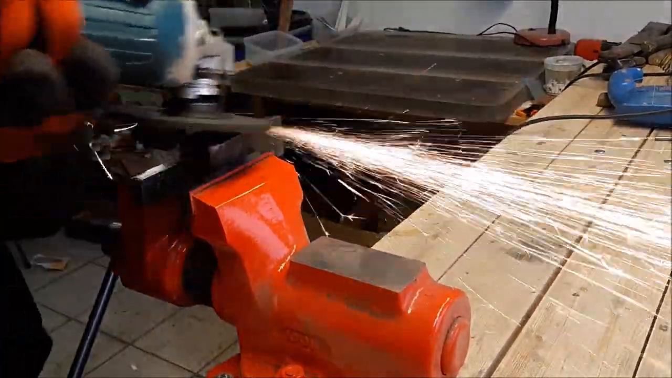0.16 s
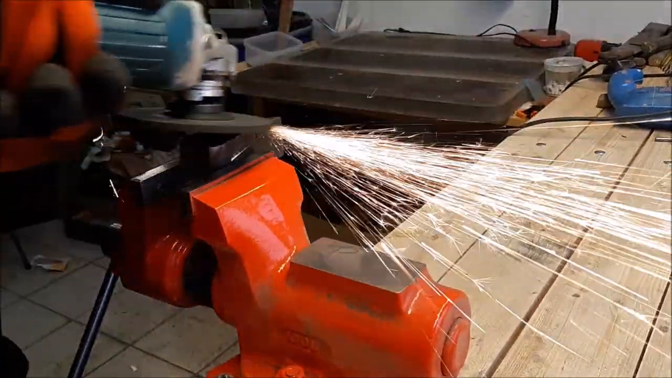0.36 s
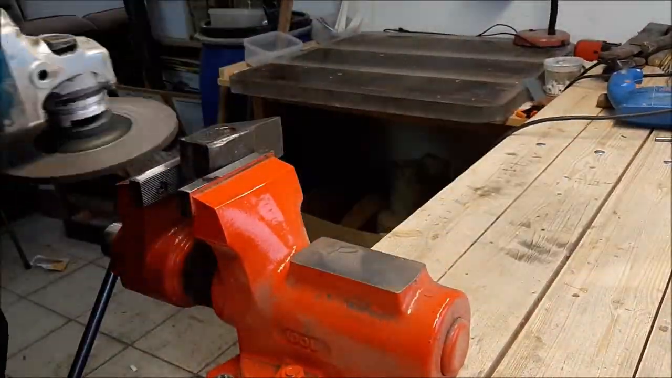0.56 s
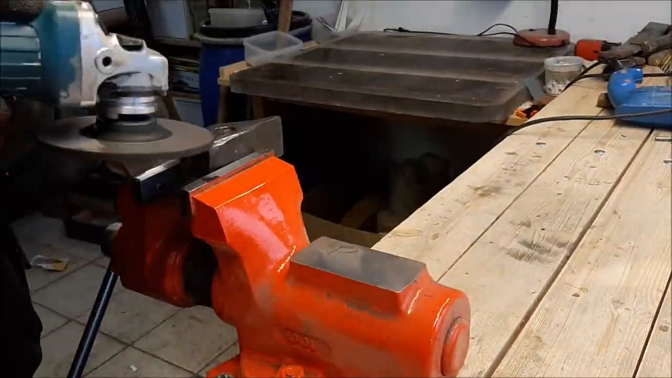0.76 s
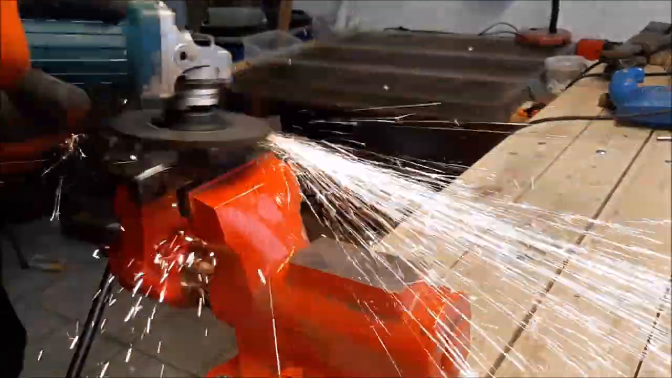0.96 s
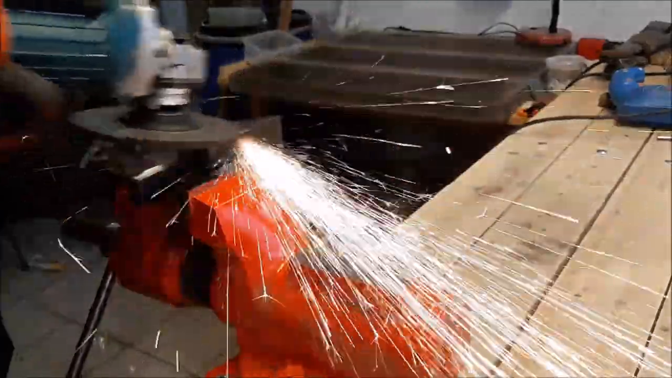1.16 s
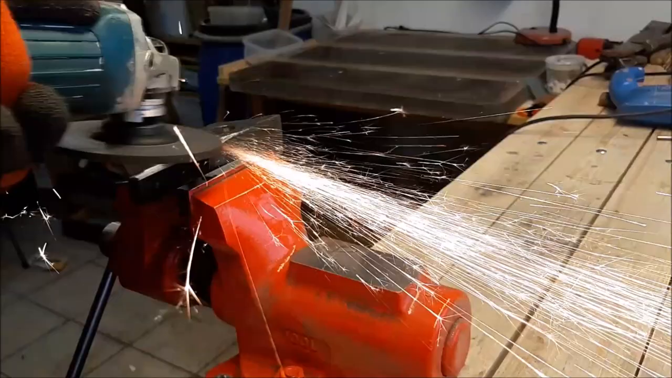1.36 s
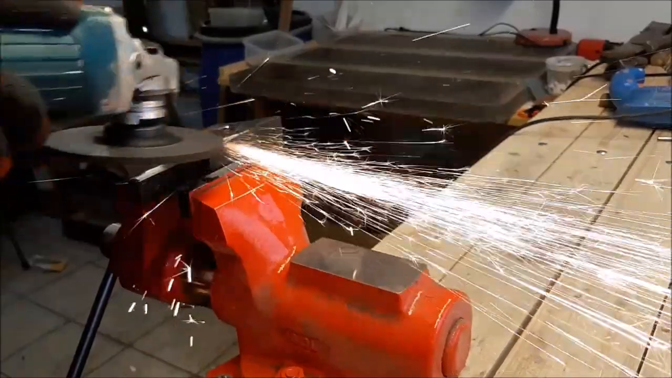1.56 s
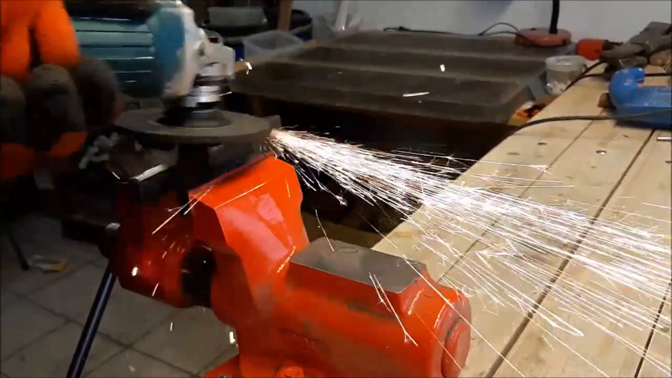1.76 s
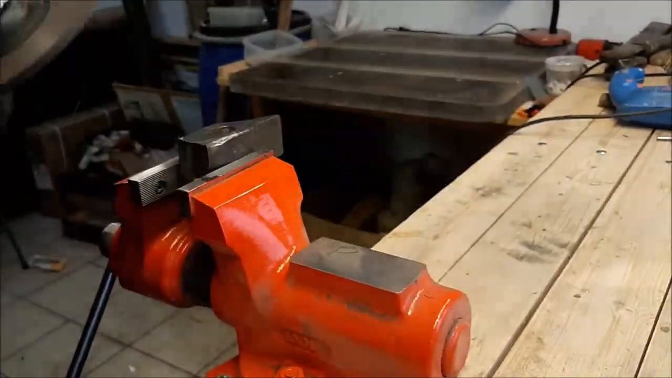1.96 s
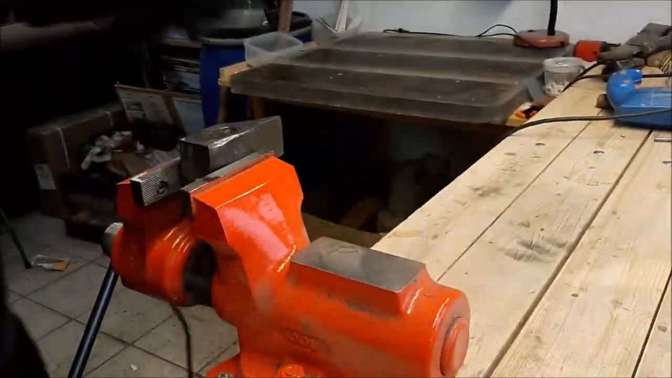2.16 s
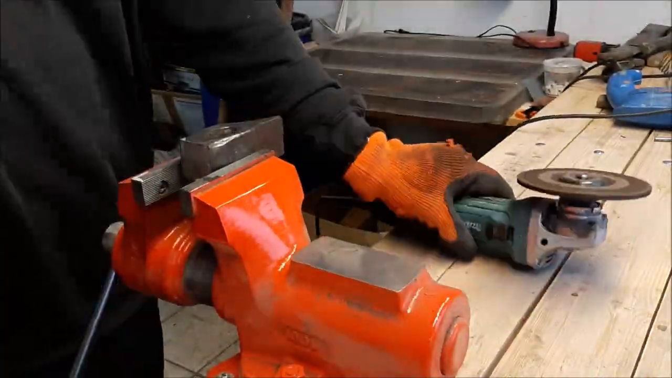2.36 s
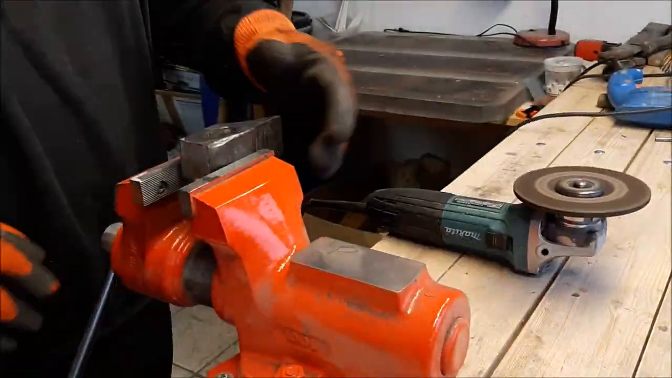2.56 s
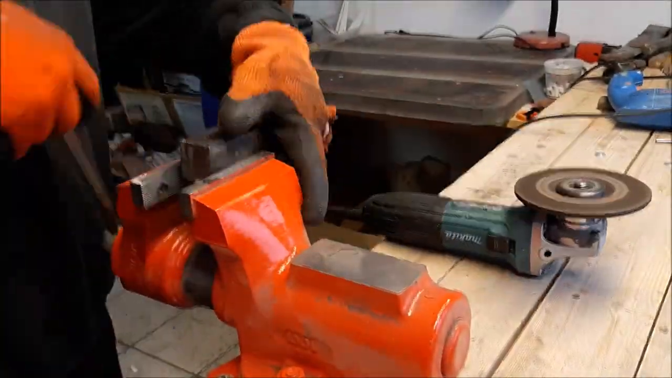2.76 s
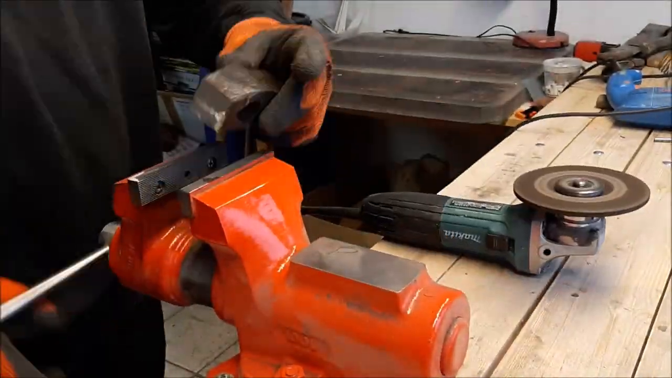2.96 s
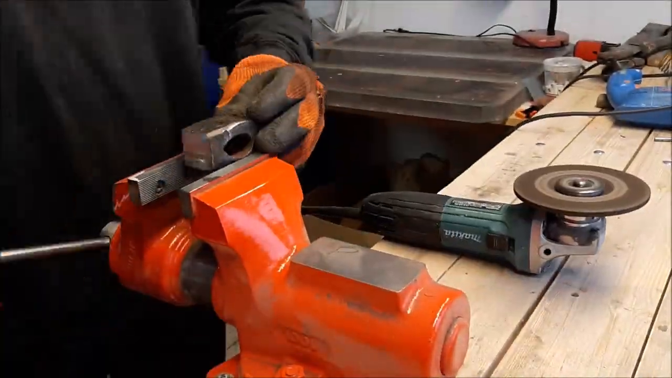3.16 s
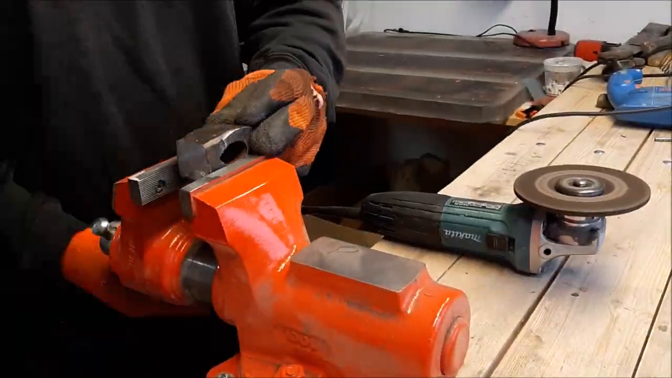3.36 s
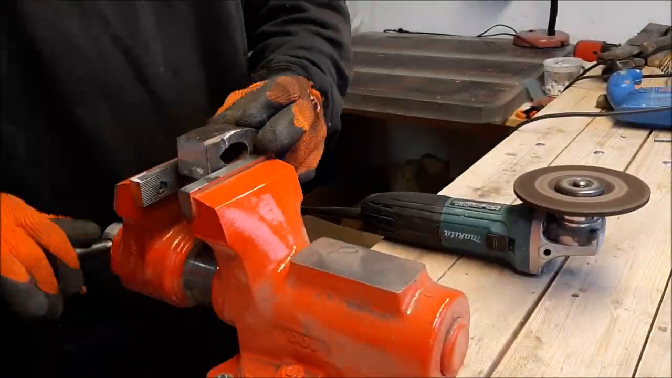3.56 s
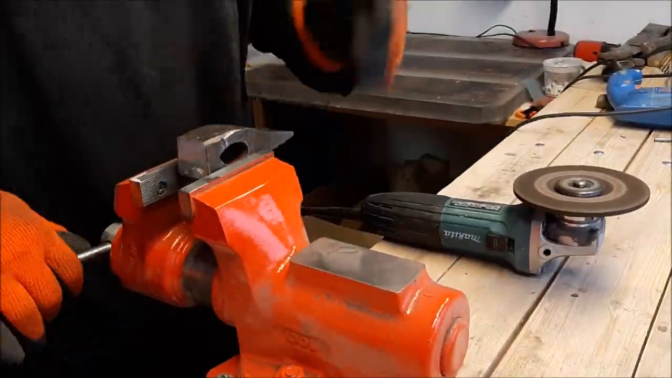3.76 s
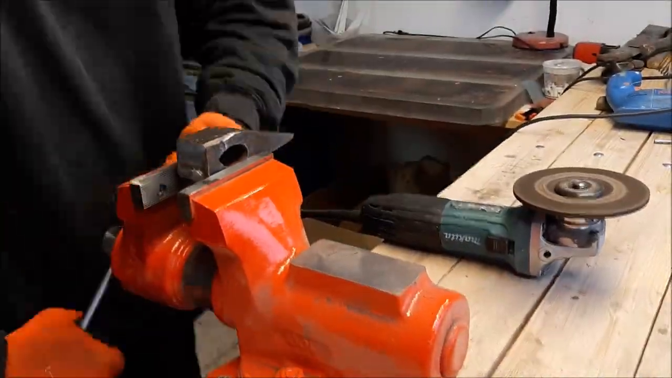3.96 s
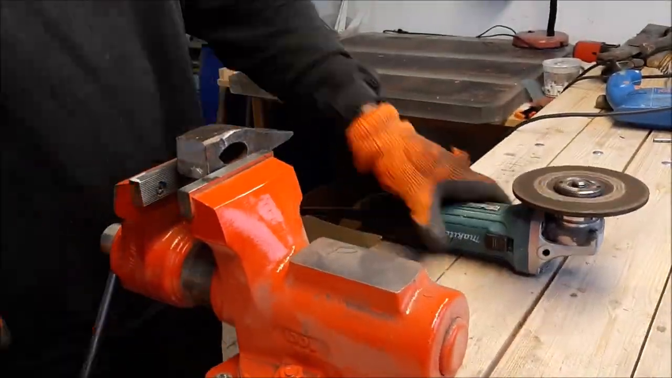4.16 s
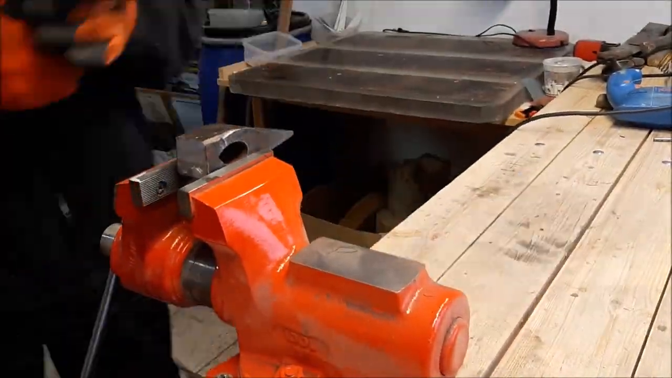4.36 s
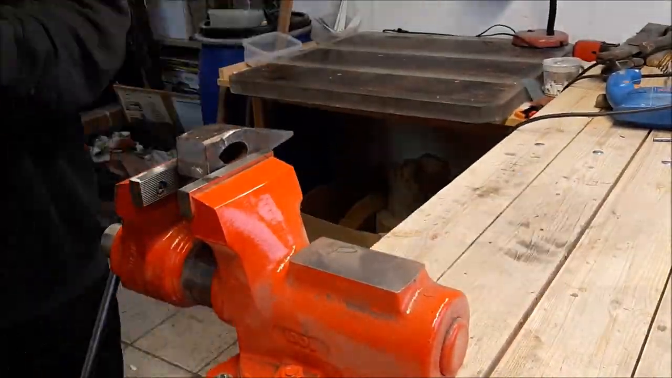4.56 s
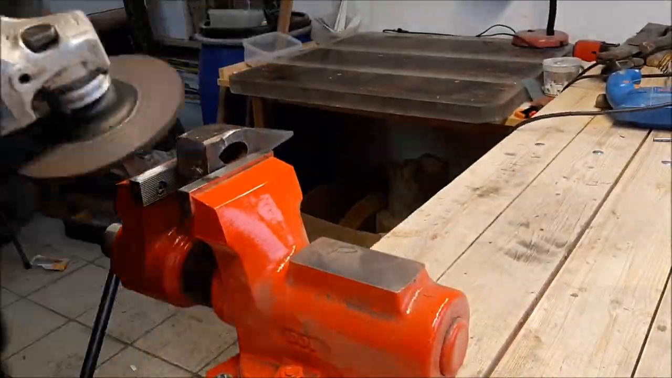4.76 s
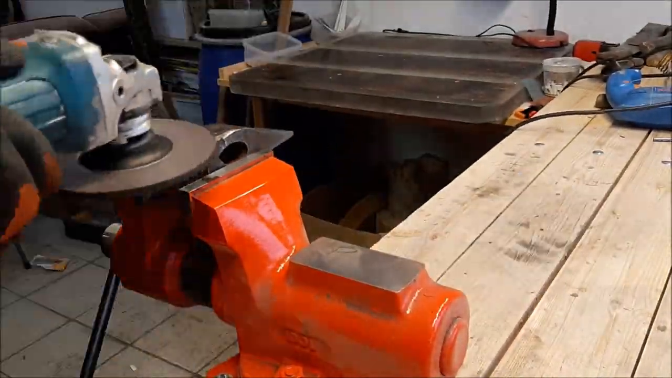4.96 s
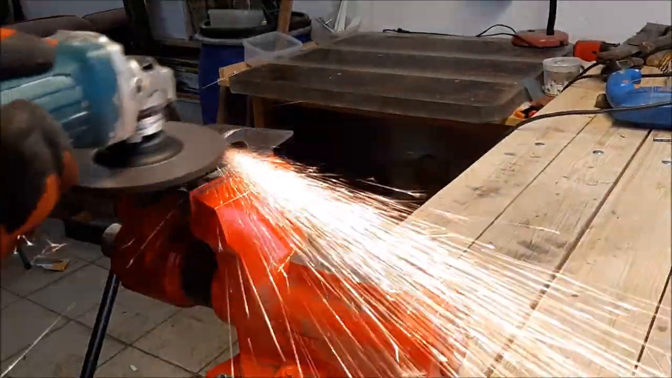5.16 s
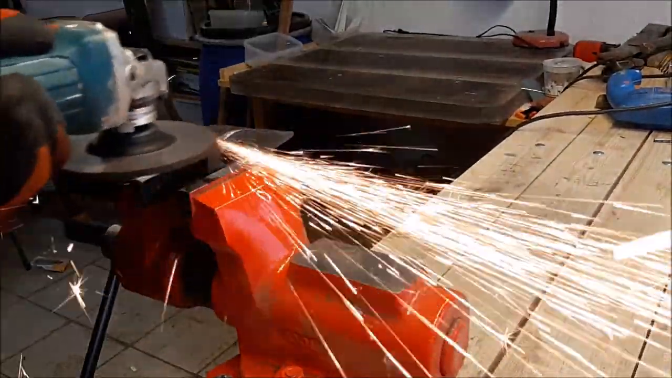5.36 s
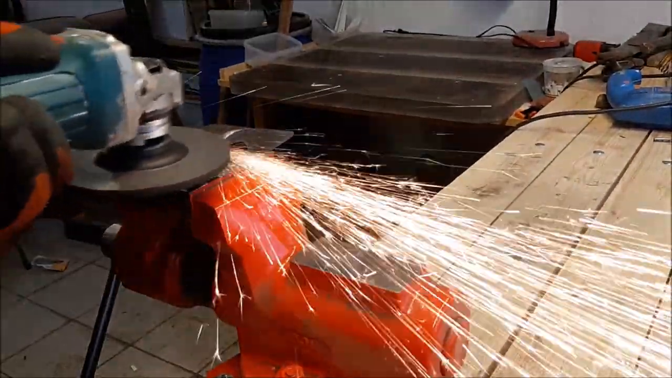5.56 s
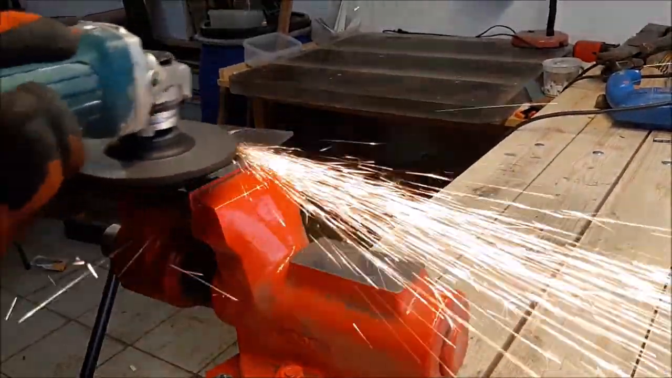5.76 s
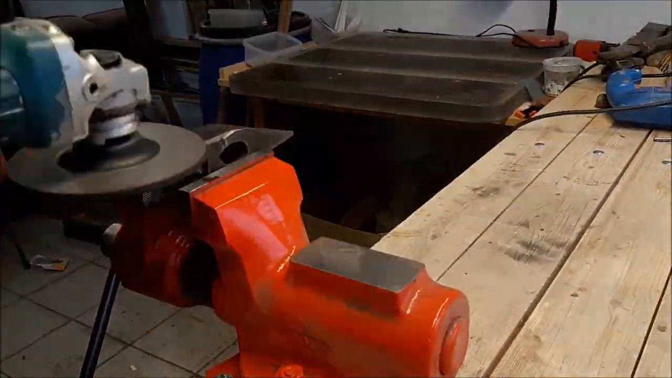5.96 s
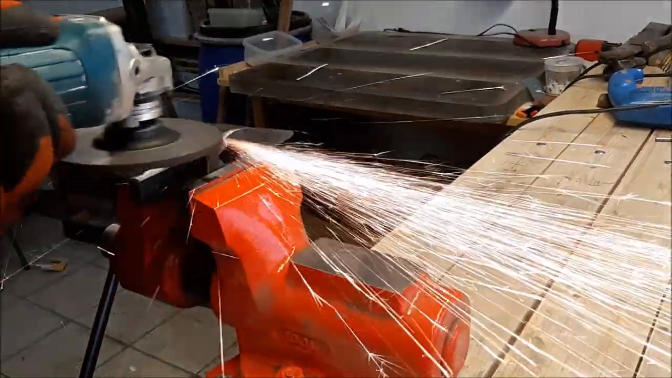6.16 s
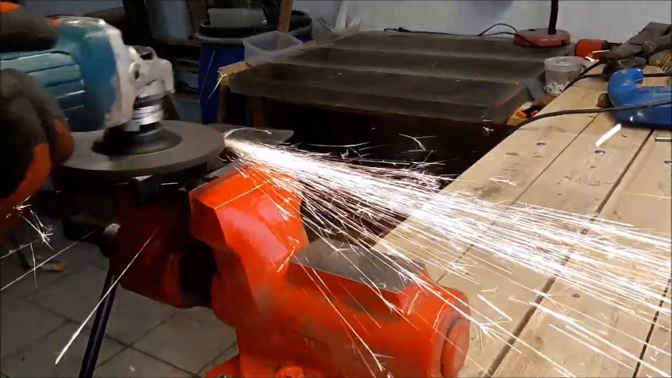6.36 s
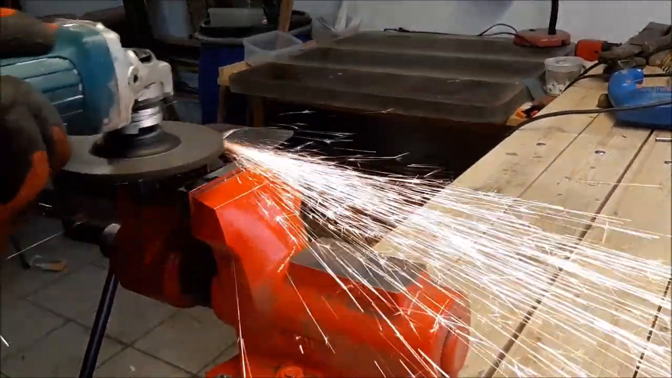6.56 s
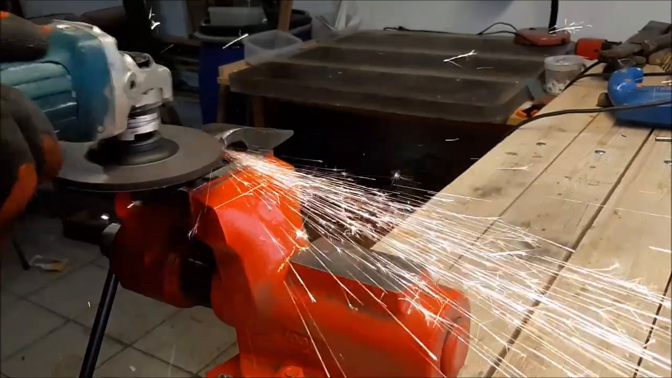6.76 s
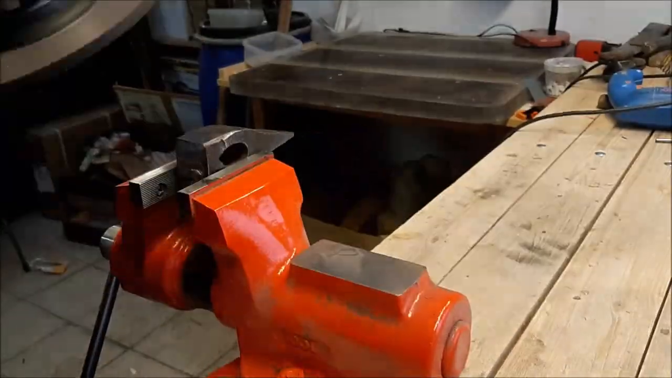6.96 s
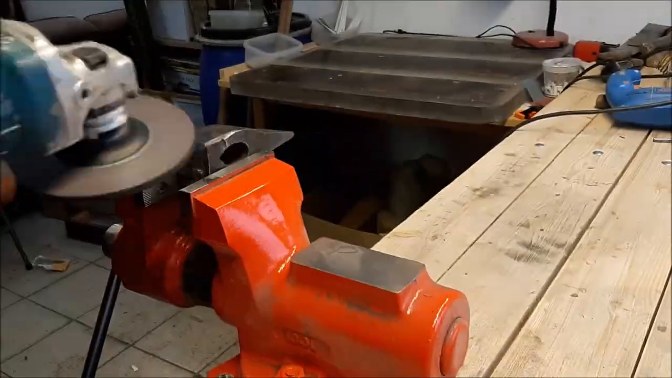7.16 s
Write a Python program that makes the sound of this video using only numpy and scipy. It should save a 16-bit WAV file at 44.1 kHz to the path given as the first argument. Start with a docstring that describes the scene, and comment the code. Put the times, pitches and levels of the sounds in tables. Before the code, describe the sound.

An angle grinder screeches and crackles against steel in two passes, its fan hissing and gears whining between them. It is switched off and laid on a wooden bench, rattling as it slows, with a few light knocks. After a knock and a brief faint rustle in the quiet workshop, it snaps on, spins up and grinds two more passes, heard close by.

```python
"""First comes the screech of an angle grinder, fast and high-pitched, on a steel tool in a workshop vise.
The disc's grit scrapes and rings the steel, pulsing once a turn, with a coarse crackle below.
Between its four passes the grinder runs free: the fan hisses and the gears whine. After the second
it is switched off and laid on the bench, where it rattles as it slows. Then it is picked up with a
knock, hands rustle in the quiet room, and it starts again."""
import sys
import numpy as np
from scipy import signal
from scipy.fft import rfft, irfft, next_fast_len
from scipy.io import wavfile
from scipy.ndimage import uniform_filter1d, map_coordinates

SR = 44100
rng = np.random.default_rng(int(sys.argv[2]) if len(sys.argv) > 2 else 0)


def transcribe(u):
    """Save the signal u as a 16-bit wav file named by the first command-line argument.

    u: samples, shape (n,) or (channels, n), limited to [-1, 1]; the rate is SR.
    q: integer samples, one column per channel.
    """
    v = np.clip(np.atleast_2d(u).T, -1, 1)
    q = np.round(v * 32767).astype(np.int16)
    wavfile.write(sys.argv[1], SR, q)


N = 317944
T = np.arange(N) / SR

# steady hum in the room: f/Hz, relative level/dB
HUM_TONES = [(640.6, -76), (963.6, -73), (1287, -77.5), (1615, -78), (1992, -81), (2326, -74), (2487, -73)]
# tone colour of the room noise: f/Hz, level/dB
ROOM_SPECTRUM = [(60, -28), (150, -45), (320, -1), (1000, -7), (2400, -0.5), (3500, -4.5), (16000, -56)]
# hands and cable rustling in the pause: t/s, level/dB
RUSTLE_LEVELS = [(4.25, -56), (4.3, -58), (4.33, -66.5), (4.42, -59), (4.45, -66), (4.5, -64), (4.52, -55),
                 (4.565, -61)]
# knocks on the housing, the last as the switch snaps on: t/s, relative level/dB
KNOCK_TIMES = [(3.1007, -27), (3.165, -26.5), (3.207, -26.5), (4.2168, -21.5), (4.236, -28),
               (4.5729, -29.5)]
# notes the knocked housing rings at: f/Hz, relative level/dB, time to fade by 60 dB/s
HOUSING_NOTES = [(1180, -5, 0.1), (1840, -13, 0.031), (2920, -0.5, 0.03), (5100, 2.5, 0.0061),
                 (7510, -4, 0.018), (13100, -3, .008), (14300, -12, .008), (15200, 7, .012)]
# the disc slowing down once switched off: t/s, turning rate/Hz
COAST_SPEEDS = [(2.08, 578), (2.32, 472), (2.5, 396), (2.7, 335), (2.85, 293), (3.05, 235), (3.3, 181),
                (3.87, 78), (4.0, 56), (4.25, 20)]
# fan hiss while it slows: t/s, level/dB
COAST_HISS_LEVELS = [(2.08, -45), (2.3, -42.5), (2.36, -44), (2.49, -40.5), (3.28, -42.5), (3.74, -44),
                     (4.2, -54)]
# tone colour of the fan: f/Hz, level/dB
FAN_SPECTRUM = [(400, -59), (900, -29), (1500, -19.5), (2200, -14), (3000, -10), (4600, -5.5), (9600, -4),
                (16000, -9)]
# resonances (pitches that get boosted) of the housing on the bench: f/Hz, width/Hz, boost/dB
HOUSING_PEAKS = [(2910, 260, 5.5), (4940, 280, 7.5), (5810, 110, 4), (6890, 110, 8), (7410, 200, 11),
                 (8500, 80, 4), (9620, 300, 9.8), (10450, 150, 4), (11500, 300, 4), (12700, 300, 3),
                 (14900, 250, 4)]
# resonances of the bench boards: f/Hz, width/Hz, boost/dB
BOARD_PEAKS = [(395, 55, 20), (680, 130, 7), (990, 90, 6), (1189, 130, 11), (1520, 70, 6), (2850, 120, 6)]
# tone colour of the rattle: f/Hz, level/dB
RATTLE_SPECTRUM = [(60, -91), (150, -35), (260, -27), (400, -31.5), (550, -24.5), (900, -12), (1500, -2),
                   (3000, -1), (6000, -33), (12000, -38)]
# tones of the whine: multiple of the disc speed, relative level/dB, phase wobble/rad
WHINE_TONES = [(2.6, -9, 3.), (3.05, 1, 1.5), (3.9, 0, 1.5), (5.05, -8, 3.), (6.1, -7, 3.5), (7.8, -4, 3.5)]
# tone of the gear teeth while the disc slows: t/s, base level/dB
TEETH_LEVELS = [(2.7, -75), (2.85, -56), (3.1, -59), (3.3, -56), (3.45, -68), (3.84, -70), (3.9, -62),
                (4.0, -62), (4.06, -75)]
# passes over the steel: touch t/s, lift t/s, turning rate under load/Hz, time to sag/s
PASSES = [(-.3, 0.506, 455, 0.11), (.86, 1.905, 430, .11), (5.1, 6.036, 400, .2), (6.155, 6.936, 457, 0.12)]
# moments when the disc digs in: t/s, crackle level/dB
BITE_TIMES = [(0.019, -41.5), (0.131, -37.5), (0.187, -39), (0.281, -36), (0.37, -36.5), (0.484, -37),
              (0.905, -36), (1.003, -36.5), (1.035, -45), (1.137, -35.5), (1.205, -39), (1.268, -37),
              (1.318, -34), (1.373, -39), (1.396, -45.5), (1.435, -44), (1.511, -39.5), (1.575, -43),
              (1.628, -43), (1.719, -36), (1.873, -41), (5.142, -39.5), (5.183, -43), (5.234, -37.5),
              (5.331, -49), (5.425, -32.5), (5.463, -39), (5.57, -44.5), (5.61, -57), (5.673, -37.5),
              (5.714, -35), (5.784, -36.5), (5.856, -41), (5.907, -38.5), (5.972, -43), (6.021, -35),
              (6.181, -45), (6.281, -57), (6.328, -38.5), (6.437, -39), (6.658, -44), (6.707, -52),
              (6.844, -36), (6.89, -35), (6.911, -33.5)]
# crackle between bites, one table a pass: t/s, level/dB
CRACKLE_LEVELS = [
    [(0, -43.5), (.15, -38), (.25, -45), (.46, -42)],
    [(.84, -44), (.9, -38), (1.06, -41.5), (1.45, -42), (1.53, -37), (1.65, -43), (1.78, -46), (1.87, -42)],
    [(5.08, -48.5), (5.2, -43), (5.45, -43), (5.57, -54), (5.63, -43.5), (5.7, -35), (5.82, -42),
     (6.0, -43)],
    [(6.16, -49), (6.28, -38), (6.35, -47.5), (6.43, -37), (6.56, -56), (6.63, -52), (6.71, -37.5),
     (6.79, -53), (6.86, -39.5)],
]
# tone colour of the crackle: f/Hz, level/dB
CRACKLE_SPECTRUM = [(30, -39), (120, -38), (200, -18.5), (310, -18.5), (420, -9), (900, 1), (1600, 1.5),
                    (4000, -1), (6500, -3), (12000, -45)]
# pressure on the disc, heard as screech, one table a pass: t/s, level/dB
SCREECH_LEVELS = [
    [(0.0, -47.5), (0.378, -41.5), (0.496, -39.5)],
    [(0.84, -45.5), (0.926, -38), (1.068, -45), (1.336, -41.5), (1.796, -41), (1.856, -49), (1.882, -39.5)],
    [(5.08, -50), (5.182, -43.5), (5.35, -56), (5.366, -43.5), (5.754, -43), (5.962, -43), (6.016, -37.5)],
    [(6.14, -58), (6.198, -38), (6.286, -43), (6.484, -41), (6.89, -44)],
]
# tone colour of the scraping grit: f/Hz, level/dB
SCRAPE_SPECTRUM = [(3000, -40), (5500, -11.5), (6600, -15), (7200, 1), (10000, -8), (10500, -4.5),
                   (12300, -8), (13500, -2.5), (14800, 0), (16000, -4)]
# notes of the steel lying flat, passes 1 and 2: f/Hz, width/Hz, relative level/dB
FLAT_STEEL_NOTES = [(6950, 200, -14), (7360, 120, -11), (7700, 220, -10), (8150, 250, -13),
                    (8680, 150, -12), (8980, 140, -8), (9260, 140, -13), (9480, 120, -11),
                    (11300, 250, -15), (13050, 500, -13)]
# notes of the steel turned, passes 3 and 4: f/Hz, width/Hz, relative level/dB
TURNED_STEEL_NOTES = [(7390, 120, -16), (8000, 400, -11), (8450, 150, -11), (8700, 180, -6),
                      (8960, 200, -5), (9200, 200, -8), (9450, 120, -9), (9680, 150, -9), (10000, 120, -10),
                      (11700, 400, -14), (14600, 600, -9)]

FREE_HZ, RESTART_HZ = 595, 285  # disc turns a second: running free, and at the restart
LAID_S, PICKED_UP_S, STOPPED_S, RESTART_S = 2.41, 4.21, 4.25, 4.5735
THIRD_TOUCH_S, THIRD_LIFT_S = PASSES[2][:2]
RIGHT_LAG_S = 2.9e-5  # sound reaches the right channel this much later


def undb(db):
    """Turns decibels into a factor to multiply by."""
    return 10 ** (np.asarray(db) / 20)


def unit(x):
    """Scales a signal to an average (rms) strength of 1."""
    return x / np.sqrt(np.mean(x ** 2))


def curve(rows):
    """Joins (time, value) points with straight lines."""
    return np.interp(T, *np.transpose(rows))


def gate(rise, fall):
    """Opens from 0 to 1 along one ramp and closes along the other."""
    return np.clip(np.minimum(rise, fall), 0, 1)


def approach(since_s, start, goal, tau_s):
    """Glides from start to goal, quickly at first and then ever more slowly."""
    return goal + (start - goal) * np.exp(-np.maximum(T - since_s, 0) / tau_s)


def walk(rate):
    """A smooth random wobble that takes about `rate` new values a second."""
    hold = int(SR / rate)
    steps = np.repeat(rng.standard_normal(N // hold + 1), hold)
    return 1.2 * uniform_filter1d(uniform_filter1d(steps, hold), hold)[:N]


def boost(hz, peaks):
    """Decibels that resonances add at a pitch."""
    return sum(db / (1 + (2 * (hz - centre) / width) ** 2) for centre, width, db in peaks)


def colour(x, points, peaks=(), lag_s=0.):
    """Gives a sound a tone colour, with resonances and a delay if asked."""
    size = next_fast_len(N)
    hz = np.maximum(np.arange(size // 2 + 1) * SR / size, 1)
    point_hz, point_db = np.transpose(points)
    db = np.interp(np.log(hz), np.log(point_hz), point_db) + boost(hz, peaks)
    return irfft(rfft(x, size) * undb(db) * np.exp(-2j * np.pi * hz * lag_s), size)[..., :N]


def split(x, hz):
    """The parts of a sound below and above a pitch."""
    low = signal.sosfiltfilt(signal.butter(4, hz, fs=SR, output="sos"), x)
    return low, x - low


def patchy(x, depth_db, width_hz, length_s):
    """Lets narrow bands of pitch swell and fade on their own, the low ones more deeply."""
    hz, times, bands = signal.stft(x, SR, nperseg=1024)
    cells = rng.standard_normal((int(SR / 2 / width_hz) + 2, int(N / SR / length_s) + 3))
    swell = map_coordinates(cells, np.meshgrid(hz / width_hz, times / length_s, indexing="ij"), order=1)
    depth = 1.5 * depth_db * (1 + 1 / (1 + (hz[:, None] / 1500) ** 2))
    return unit(signal.istft(bands * undb(depth * swell), SR)[1][..., :N])


def stereo(shared, own, share, lag_s):
    """Left and right share one sound, the right up to a moment later, and each adds its own."""
    right = colour(shared, [(1, 0), (2, 0)], lag_s=lag_s)
    return np.sqrt(share) * np.array([shared, right]) + np.sqrt(1 - share) * own


def hiss(share, lag_s=0.):
    """Noise that left and right partly share."""
    noise = rng.standard_normal((3, N))
    return stereo(noise[0], noise[1:], share, lag_s)


def grains(spread_db):
    """Dense clicks of uneven size, different on the left and right."""
    return rng.standard_normal((2, N)) * undb(spread_db * np.minimum(rng.exponential(size=(2, N)), 5))


def turning_noise(turns, wear_turns):
    """A rough rim comes round again every turn and slowly wears into a new shape."""
    wear = turns / wear_turns
    rims = irfft(rng.standard_normal((int(wear[-1]) + 2, 40, 2)) @ np.array([1, 1j]), 1024)
    shape, spot = wear.astype(int), (turns % 1 * 1024).astype(int)
    fade = wear % 1 * np.pi / 2
    return unit(rims[shape, spot] * np.cos(fade) + rims[shape + 1, spot] * np.sin(fade))


def coasting():
    """1 while switched off, 0 while driven; the drive lets go over 0.06 s."""
    return np.clip((T - COAST_SPEEDS[0][0]) / .06 + 1, 0, 1) * (T < RESTART_S)


def disc_speed():
    """Turns a second: the disc sags in each pass and recovers; midway it coasts and spins up again."""
    speed = np.full(N, float(FREE_HZ))
    for touch, lift, loaded_hz, sag_s in PASSES:
        if touch == THIRD_TOUCH_S:
            speed += coasting() * (curve(COAST_SPEEDS) - speed)
            speed = np.where(T >= RESTART_S, approach(RESTART_S, RESTART_HZ, FREE_HZ, .14), speed)
        for since_s, goal_hz, tau_s in (touch, loaded_hz, sag_s), (lift, FREE_HZ, .12):
            start_hz = speed[max(int(since_s * SR), 0)]
            speed = np.where(T >= since_s, approach(since_s, start_hz, goal_hz, tau_s), speed)
    return speed


def workshop():
    """Hum and soft room noise, heard in the pause before the restart."""
    pause = gate((T - 4.0) / .13, (RESTART_S + .042 - T) / .026)
    hum = sum(undb(db + 2.5) * np.sin(2 * np.pi * hz * T) for hz, db in HUM_TONES)
    room = undb(-62.5) * unit(colour(hiss(.57), ROOM_SPECTRUM))
    return pause * (hum + room)


def rustle():
    """Hands and cable make a faint, high brushing noise."""
    moving = gate((T - RUSTLE_LEVELS[0][0]) / .023 + 1, (RUSTLE_LEVELS[-1][0] - T) / .023 + 1)
    _, treble = split(rng.standard_normal((2, N)), 3200)
    return moving * undb(curve(RUSTLE_LEVELS)) * unit(treble)


def knocks():
    """Each knock is a short crack of noise that sets the housing ringing."""
    t, out = T[:SR // 5], np.zeros((2, N))
    notes = sum(undb(db) * np.sin(2 * np.pi * hz * t) * 1000 ** (-t / fade_s) * SR / (2 * np.pi * hz)
                for hz, db, fade_s in HOUSING_NOTES)
    for at_s, db in KNOCK_TIMES:
        burst = rng.standard_normal((2, len(t))) * np.exp(-t / .0061)
        crack = signal.sosfilt(signal.butter(2, 1200, "high", fs=SR, output="sos"), burst)
        ring = signal.fftconvolve(np.diff(burst, prepend=0), notes[None], axes=1)[:, :len(t)]
        start = int(at_s * SR)
        out[:, start:start + len(t)] += undb(db) * (undb(-33) * ring + undb(-8.5) * crack)
    return out


def bench_thrum(turns, lying):
    """The unbalanced disc shakes the boards: a low tone and its octave swell and fade."""
    low_db = -62 - 80 * np.maximum(T - 2.5, 2 * (2.5 - T)) + 3.42 * walk(22.1)
    low = undb(low_db) * np.sin(2 * np.pi * turns + 1.5 * walk(50))
    octave_db = -65 - 45 * np.abs(T - 2.72) + 3 * walk(20)
    octave = undb(octave_db) * np.sin(4 * np.pi * turns + 1.5 * walk(50))
    return lying * (low + octave)


def bench_rattle(lying, slack):
    """Loose gears clatter and the boards under them buzz fitfully."""
    level = lying ** 3 * undb(-52 - .5 * (T - LAID_S) + walk(14))
    clicks = stereo(unit(grains(2.9)[0]), unit(grains(1.5)), share=.69, lag_s=0.)
    clatter = colour(slack * clicks, RATTLE_SPECTRUM, BOARD_PEAKS)
    return level * patchy(clatter, 2.2, width_hz=110, length_s=.04)


def gear_teeth(turns, speed, lying, slack):
    """Meeting teeth sing a falling tone on the bench; their looseness smears its pitch."""
    teeth_per_turn = 38.5
    phase = 2 * np.pi * teeth_per_turn * turns + 1.5 * np.minimum(speed / 200, 1) * walk(400)
    db = curve(TEETH_LEVELS) + .5 * boost(teeth_per_turn * speed, HOUSING_PEAKS) + 2.6 * walk(25)
    return lying * slack * undb(db) * np.sin(phase)


def whine(turns, speed, lying):
    """Shafts and gears whine at multiples of the disc speed, louder on the bench and while speeding up."""
    take_up_db = approach(RESTART_S, -40, 0, tau_s=.035)  # the gears take up the load
    restart_db = -62 + 20 * (1 - speed / FREE_HZ) + take_up_db
    base_db = np.where((T > RESTART_S) & (T < THIRD_TOUCH_S), restart_db, -66 + 10 * lying)
    out = 0
    for multiple, tone_db, wobble in WHINE_TONES:
        hz = multiple * speed
        level = undb(base_db + tone_db + lying * boost(hz, BOARD_PEAKS) + 2.6 * walk(25))
        level *= np.clip(hz / 850, 0, 1) ** 8  # the small housing hardly gives off low tones
        level /= 1 + (226 / speed) ** 24  # dies away below 226 turns a second
        out += level * np.sin(2 * np.pi * multiple * turns + wobble * walk(60))
    return out


def fan_db(speed):
    """Fan loudness: grows with speed, surges at the restart and follows its table while coasting."""
    db = -43 + 28 * np.log10(speed / FREE_HZ)
    extra_db = curve([(THIRD_TOUCH_S, 4.5), (THIRD_LIFT_S, 0)])
    surge_db = approach(RESTART_S, 18, 0, tau_s=.061)
    db += (T > RESTART_S) * (extra_db + surge_db)
    return db + coasting() * (curve(COAST_HISS_LEVELS) - db)


def fan(turns, speed, lying, slack):
    """Air hisses, blades and brushes repeat every turn, and on the bench the housing rings along."""
    air = slack * (hiss(.25, RIGHT_LAG_S) + .35 * turning_noise(turns, wear_turns=4))
    air = patchy(air, 2.6, width_hz=160, length_s=.04)
    held = unit(colour(air, FAN_SPECTRUM))
    laid = unit(colour(air, FAN_SPECTRUM, HOUSING_PEAKS))
    low, high = split(held + lying * (laid - held), 12070)
    treble_db = 4 - 3 * lying
    return undb(fan_db(speed)) * (unit(low) + undb(treble_db) * unit(high))


def motor(turns, speed):
    """All the sounds of the spinning grinder itself, silent from the stop to the restart."""
    running = np.clip(np.maximum((STOPPED_S - T) / .04, (T - RESTART_S) / .001), 0, 1)
    lying = gate((T - LAID_S) / .033 + 1, (PICKED_UP_S - T) / .033 + 1)  # 1 on the bench, 0 in the hand
    # the level flutters; on the bench loose gears also make it pulse once a turn
    slack = undb(lying * (2 * np.cos(2 * np.pi * turns) + .44 * walk(60)) + .5 * walk(18))
    return running * (fan(turns, speed, lying, slack) + bench_rattle(lying, slack)
                      + whine(turns, speed, lying) + bench_thrum(turns, lying)
                      + gear_teeth(turns, speed, lying, slack))


def bites(width_s=.009):
    """Strength of the crackle in the short moments when the disc digs in."""
    return np.sqrt(sum(undb(2 * db) * np.exp(-((T - at_s) / width_s) ** 2) for at_s, db in BITE_TIMES))


def rough_crackle(beat):
    """Coarse, flickering clicks that pulse with the disc."""
    clicks = grains(3) * beat * undb(2.2 * walk(200) + 1.2 * walk(70))
    return patchy(colour(clicks, CRACKLE_SPECTRUM), 1.6, width_hz=200, length_s=.03)


def grit_scrape(turns, beat):
    """The gritty rim rubs the steel: a bright noise that partly repeats every turn."""
    rims = np.array([turning_noise(turns, wear_turns=5.6) for _ in range(3)])
    rubbing = .6 * stereo(rims[0], rims[1:], .5, RIGHT_LAG_S) + .8 * hiss(.5, RIGHT_LAG_S)
    return undb(-1) * unit(colour(beat * rubbing, SCRAPE_SPECTRUM))


def steel_ring(notes):
    """Each note of the steel swells and fades by itself and drifts a little as the contact moves."""
    out = 0
    for hz, width, db in notes:
        phase = 2 * np.pi * np.cumsum(hz * (1 + .004 * walk(12))) / SR
        phase = phase - 2 * np.pi * hz * np.array([[0], [RIGHT_LAG_S]])
        level = undb(db + 4.5 * walk(30))
        wobbles = np.array([walk(1.3 * width) for _ in range(6)])  # blur the note into a narrow band
        sine = (wobbles[0] + .8 * wobbles[2:4]) * np.sin(phase)
        cosine = (wobbles[1] + .8 * wobbles[4:]) * np.cos(phase)
        out += level * (sine + cosine) / 2
    return out


def grinding(turns):
    """The disc on the steel: scrape and ringing make the screech, and each bite lifts it and the crackle."""
    beat = undb(2.2 * np.cos(2 * np.pi * turns) + .8 * walk(40))  # the disc does not spin quite true
    scrape = grit_scrape(turns, beat)
    flat = split(scrape + beat * steel_ring(FLAT_STEEL_NOTES), 9120)
    turned = split(scrape + beat * steel_ring(TURNED_STEEL_NOTES), 9120)
    crackle, bite, out = rough_crackle(beat), bites(), 0
    for i, (low, high) in enumerate((flat, flat, turned, turned)):
        touch, lift = PASSES[i][:2]
        contact = gate((T - touch) / .042 + 1, (lift - T) / .069 + .5) ** 2
        low_db = curve(SCREECH_LEVELS[i])
        high_db = -35 + .68 * (low_db + 45.5)  # the treble follows the pressure less
        screech = (1 + 16 * bite) * (undb(low_db) * unit(low) + undb(high_db) * unit(high))
        crackle_level = np.hypot(undb(curve(CRACKLE_LEVELS[i])), bite)
        out += contact * (screech + crackle_level * crackle)
    return out


def scene():
    """Adds everything up; one slightly wavering disc speed drives both grinding and motor."""
    speed = disc_speed() * (1 + .004 * walk(30))
    turns = np.cumsum(speed) / SR
    return grinding(turns) + motor(turns, speed) + knocks() + workshop() + rustle()


def record(dry):
    """Steeply cuts the treble above 15740 Hz."""
    return signal.sosfilt(signal.ellip(10, .2, 70, 15740, fs=SR, output="sos"), dry)


dry = scene()
out = record(dry)
transcribe(out)
```